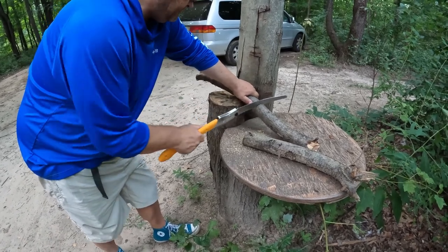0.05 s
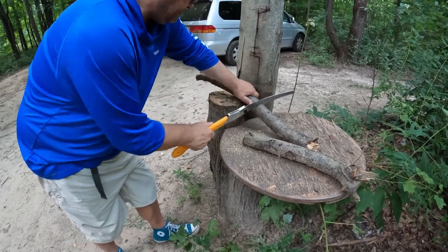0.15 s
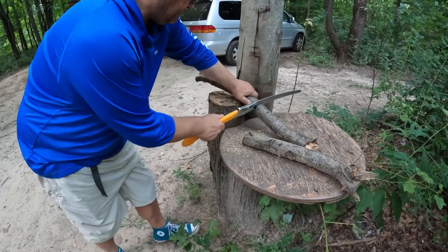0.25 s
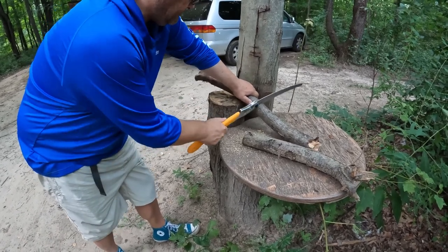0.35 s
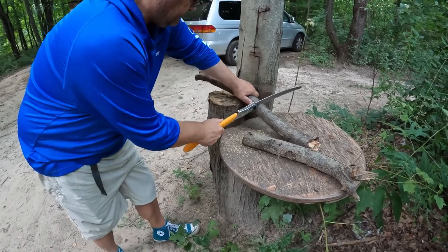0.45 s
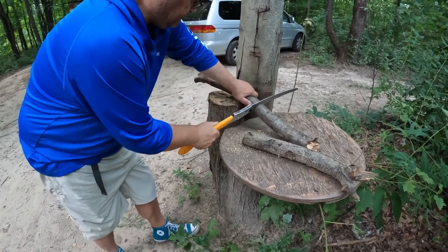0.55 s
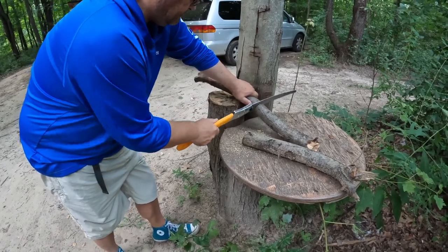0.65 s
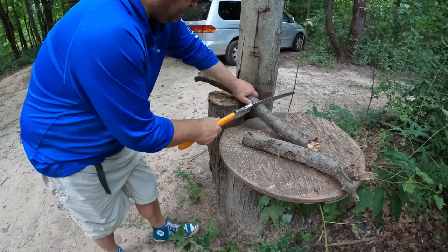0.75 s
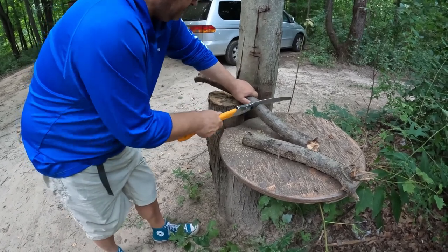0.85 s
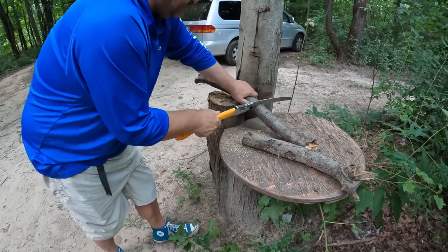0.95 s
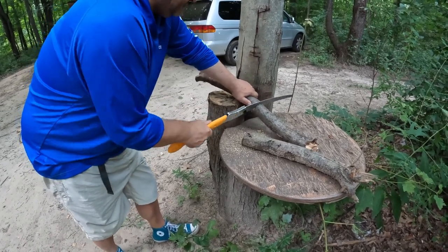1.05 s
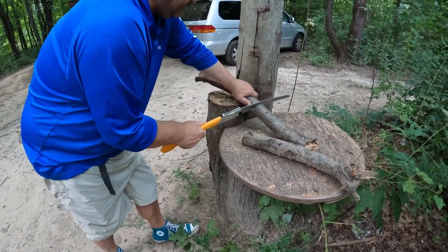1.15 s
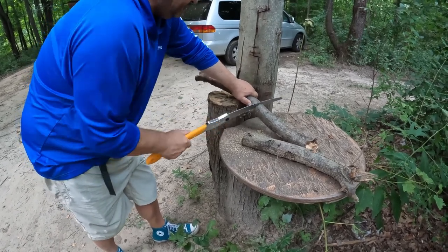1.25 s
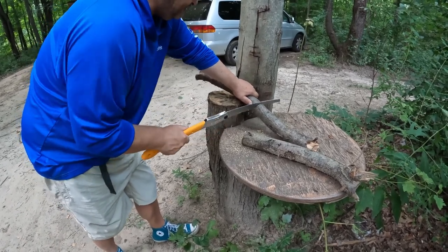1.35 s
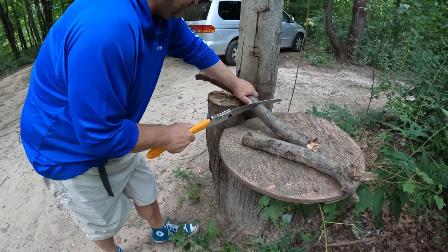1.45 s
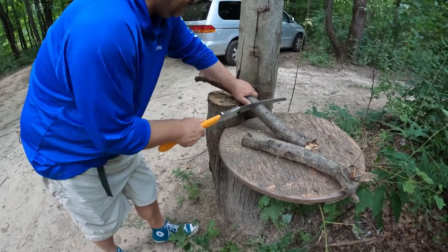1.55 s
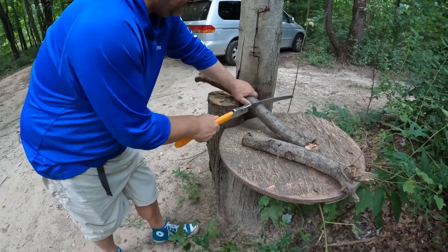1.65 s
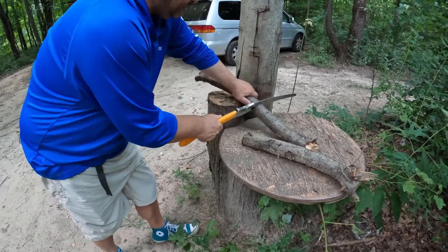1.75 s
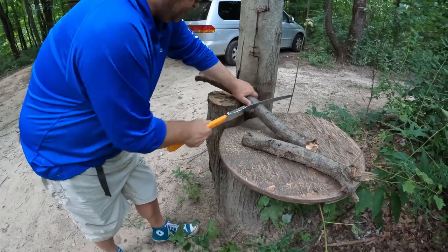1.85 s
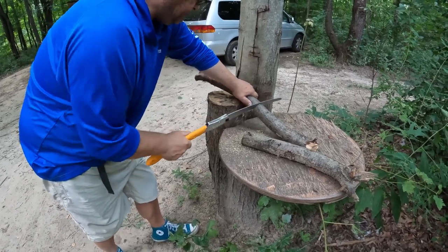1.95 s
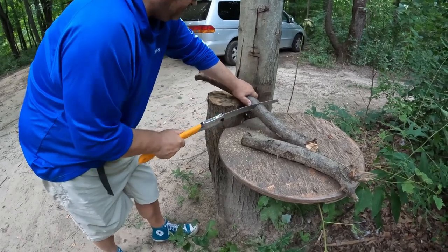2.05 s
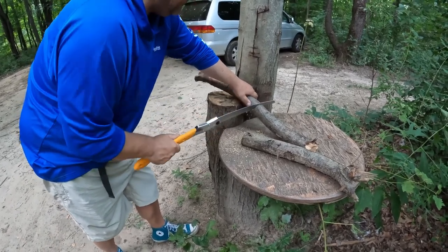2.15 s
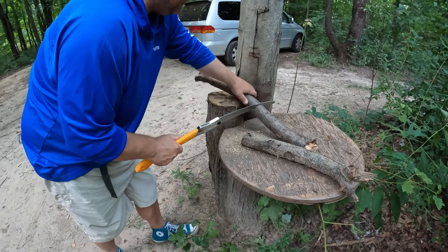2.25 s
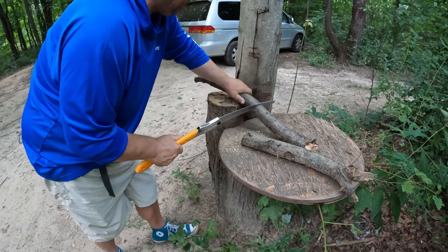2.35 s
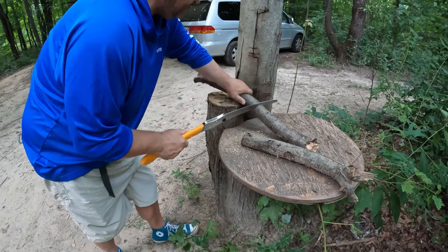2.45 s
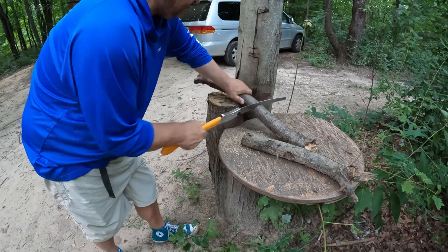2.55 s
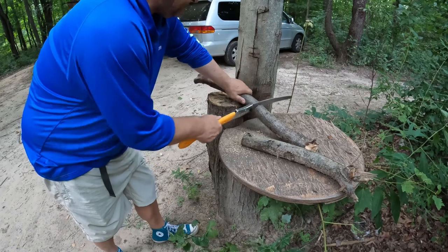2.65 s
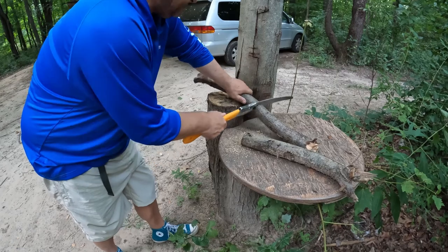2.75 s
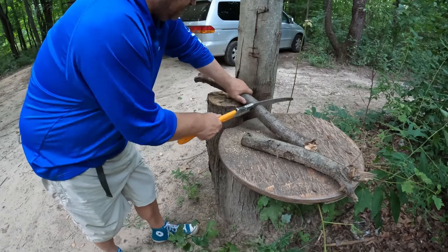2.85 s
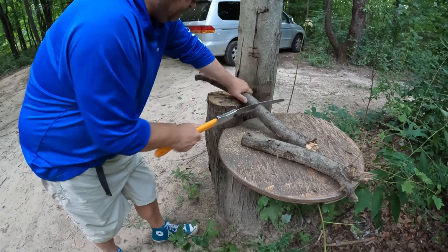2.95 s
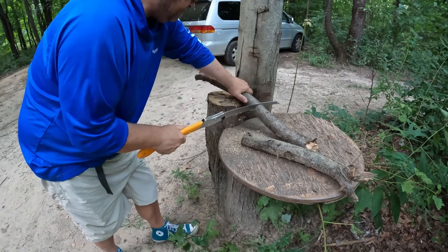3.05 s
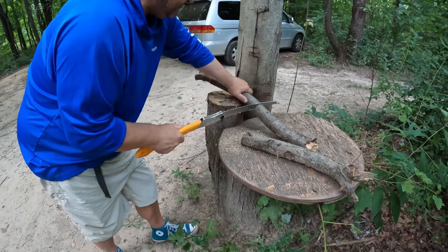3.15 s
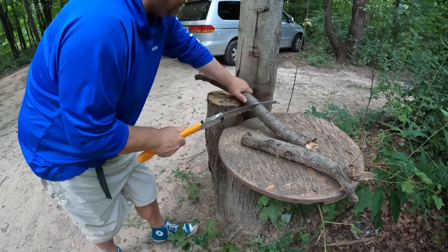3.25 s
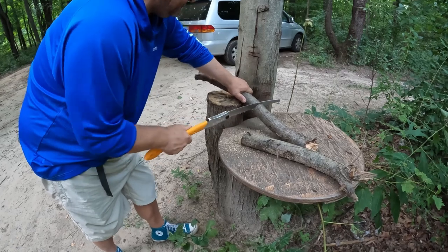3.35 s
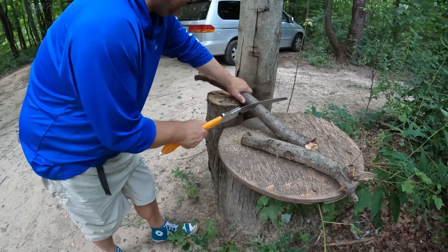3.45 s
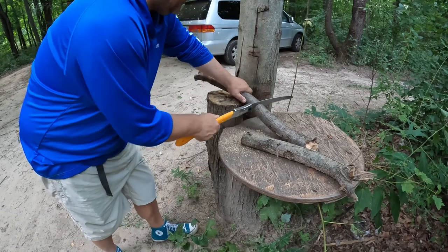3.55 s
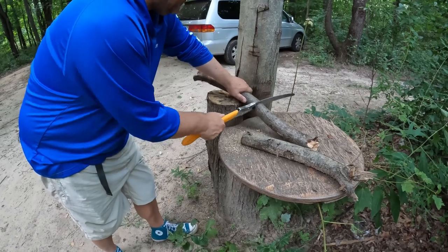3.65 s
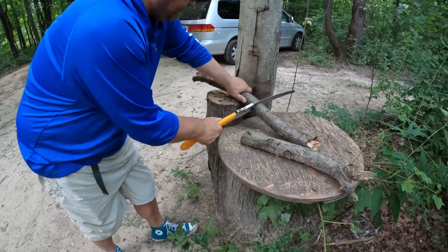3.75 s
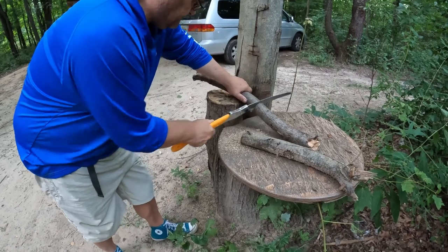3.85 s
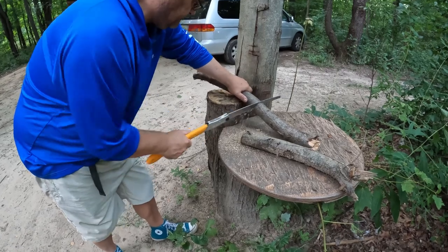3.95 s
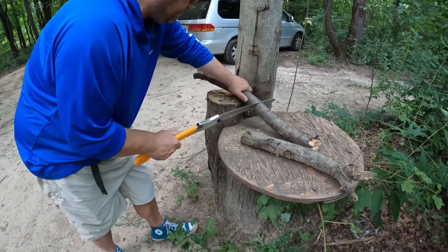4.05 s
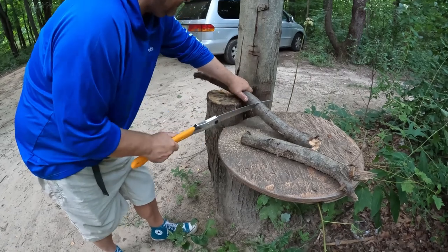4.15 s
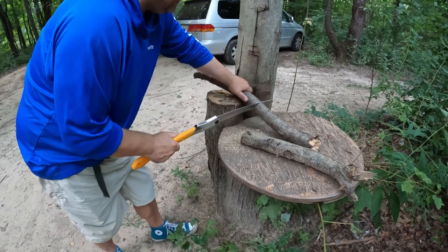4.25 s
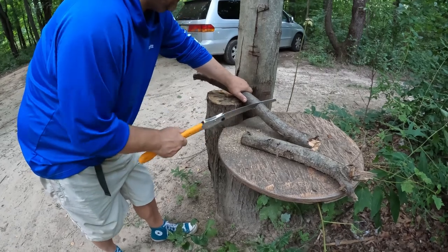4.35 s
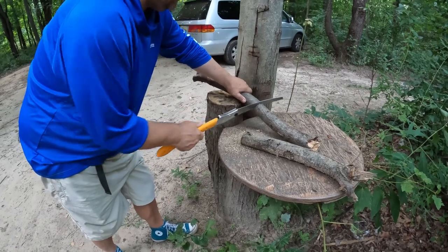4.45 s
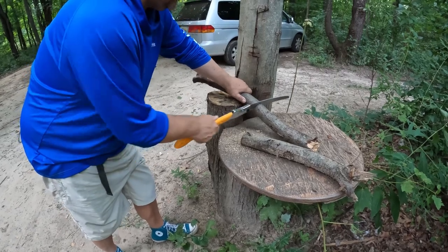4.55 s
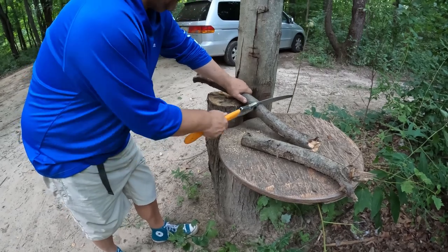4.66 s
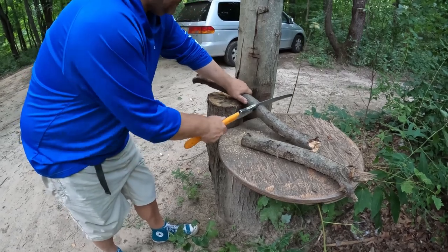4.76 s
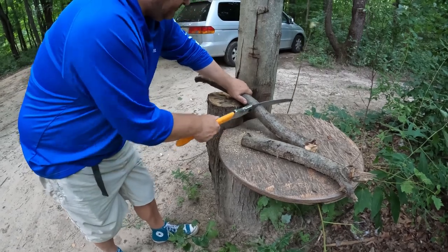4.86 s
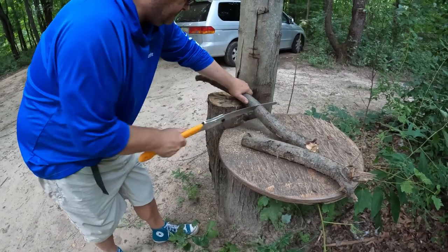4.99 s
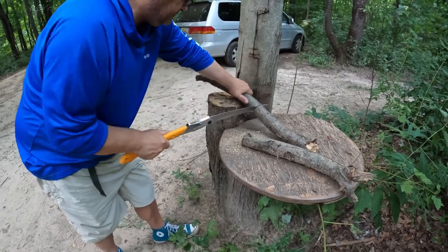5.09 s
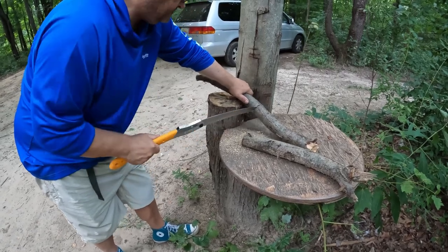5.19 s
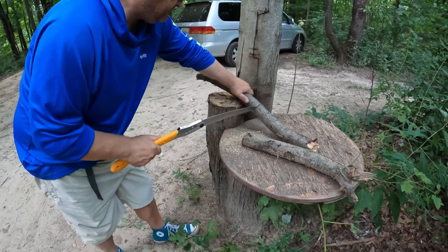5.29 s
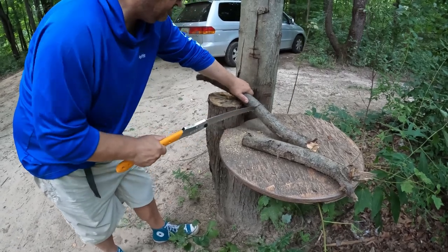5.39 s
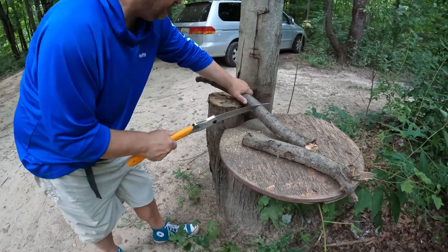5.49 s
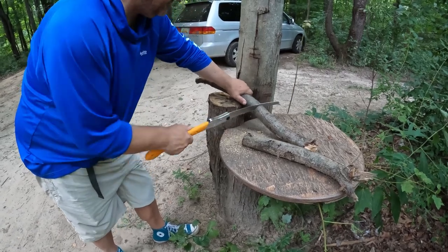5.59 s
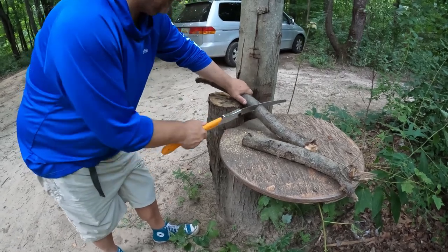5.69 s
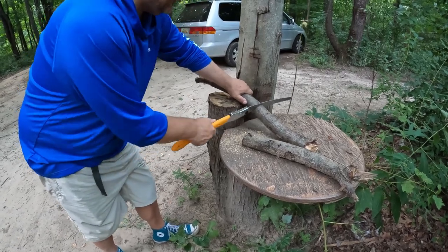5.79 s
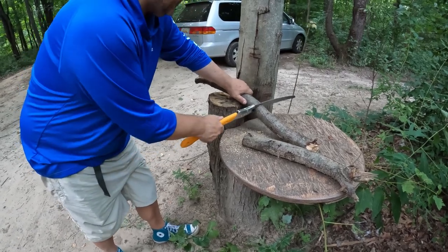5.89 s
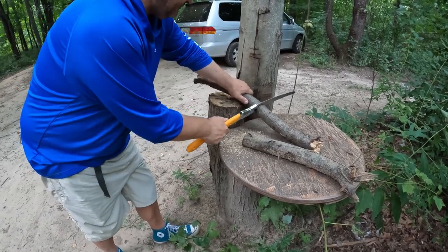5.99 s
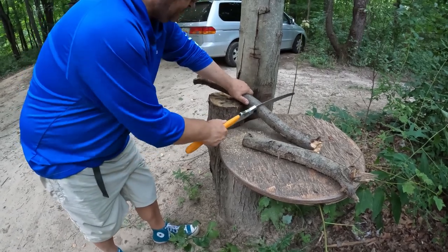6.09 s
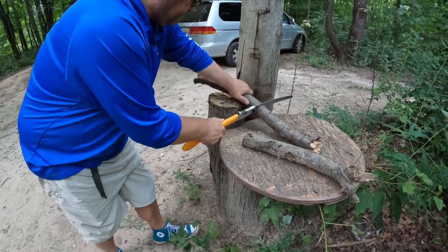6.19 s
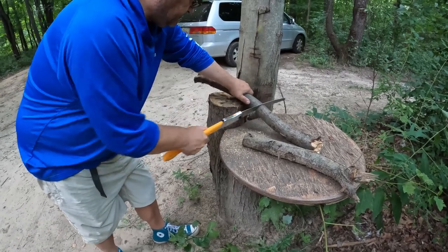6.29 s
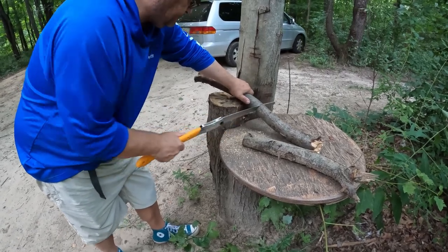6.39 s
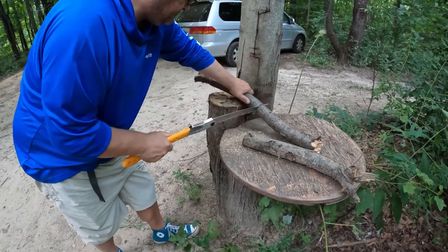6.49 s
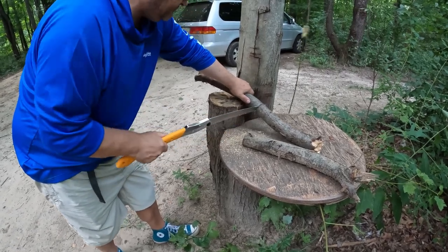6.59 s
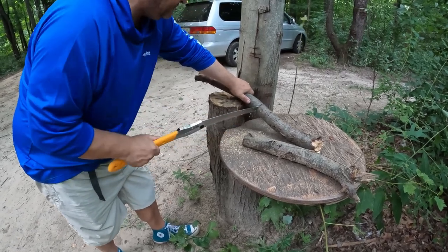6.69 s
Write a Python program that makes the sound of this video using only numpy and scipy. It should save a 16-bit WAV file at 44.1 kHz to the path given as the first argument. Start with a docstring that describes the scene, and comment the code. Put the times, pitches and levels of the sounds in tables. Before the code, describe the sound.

A hand saw works through a branch on a stump, heard from a metre or two away in dry woodland air. A push rasps from 0 to 0.45 s, ending in a knock and short grinding rub; a brief pull brings hard jolts around 0.6 s, then a pause until about 0.95. Short quick strokes follow to 1.45 s. Longer alternating strokes then run about half a second each: scratchy, bright pushes and coarser pulls with a low woody thrum near 230 Hz and a passing hollow ring. The heaviest thump lands at 1.9 s, a sharp fibre snap at 3.0. A stuttering judder comes at 4.0, knocks and rubbing at 3.8 and 4.8-4.9, a strong pull around 5.1. Clacks and grinding mark 6.0-6.2 s, then a last pull with a buzzing groan at 6.45, fading by 6.8. Faint high insect hiss and soft low air continue throughout.

```python
"""A folding pull saw cuts a branch that is held down on a stump, a metre or two from a camera in a wood.
The teeth skate on each push and tear fibres on each pull; the branch thrums, knocks on the stump and twice chatters.
Insects hiss steadily in the trees."""
import sys
import numpy as np
from scipy import signal
from scipy.fft import rfft, irfft, next_fast_len
from scipy.io import wavfile
from scipy.ndimage import uniform_filter1d, map_coordinates

SR = 44100
rng = np.random.default_rng(int(sys.argv[2]) if len(sys.argv) > 2 else 0)


def log_audio(samples):
    """Write samples as a 16-bit WAV file to the path given in sys.argv[1]."""
    # one column per channel
    frames = np.atleast_2d(samples).T
    # limit to full scale, then quantise
    limited = np.clip(frames, -1, 1)
    pcm = np.round(limited * 32767).astype(np.int16)
    wavfile.write(sys.argv[1], SR, pcm)


N = 296793

# strokes of the arm; each has one stretch where the teeth bite deeper:
# (start s, end s, pull 1 or push 0, level of the teeth dB, bite at s, bite half-length s, bite dB, thrum of the branch dB, its rocking 0-1)
STROKES = [(-.2, .03, 1, -38.5, 0, .025, 4.8, -34, 1),
           (.022, .46, 0, -42.5, .34, .03, 4, -39, .12),
           (.49, .675, 1, -55, .615, .05, 15, -46, .5),
           (.93, 1.06, 0, -61.5, .995, .015, 3, -60, .2),
           (1.062, 1.256, 1, -43, 1.125, .02, 4, -35.7, .6),
           (1.245, 1.452, 1, -45.7, 1.351, .084, 11.6, -41, .3),
           (1.51, 1.864, 0, -46.5, 1.805, .111, 10, -39, .16),
           (1.865, 2.31, 1, -45.7, 2.02, .07, 18.6, -39, .22),
           (2.46, 2.895, 0, -46.2, 2.73, .13, 6.2, -47, .03),
           (2.9, 3.282, 1, -56.5, 3.07, .157, 27, -48.5, .22),
           (3.402, 3.845, 0, -45.5, 3.61, .051, 5, -48.5, .04),
           (3.83, 4.301, 1, -47.7, 4.034, .105, 17, -37, .2),
           (4.39, 4.85, 0, -44.6, 4.718, .102, 2.9, -41.6, .02),
           (4.85, 5.368, 1, -40, 5.066, .12, 8.8, -35.4, .26),
           (5.42, 6.09, 0, -45.5, 5.77, .13, 2.5, -43, .02),
           (6.05, 6.3, 0, -54, 6.211, .025, 4, -46, .05),
           (6.24, 6.809, 1, -48.4, 6.421, .151, 18.7, -43, .08)]
# the blade catches and jolts the branch: (s, peak dB)
JOLTS = [(.409, -24.5), (1.398, -22), (2.215, -25), (2.975, -24), (3.765, -27), (3.81, -26), (4.805, -27), (.589, -16), (.629, -18), (1.191, -24), (1.21, -25), (1.312, -25), (1.905, -9), (3.857, -26), (4.092, -16), (4.2, -27.5),
         (4.877, -17), (6.083, -24), (6.21, -23.5)]
# the branch rocks against the stump: (s, peak dB)
CLACKS = [(.387, -18), (.647, -23.5), (2.486, -39), (3.754, -25), (4.767, -21), (4.903, -22), (6.034, -17.5), (6.04, -24), (6.08, -25.5)]
# single fibres snap: (s, peak dB)
SNAPS = [(0.4993, -52), (1.076, -37), (1.1218, -22), (1.54, -33), (1.6243, -25), (1.8971, -26), (2.2875, -30), (3.853, -38), (2.9734, -17.5),
         (4.875, -28), (4.903, -30)]
# the teeth stick and slip in step: (start s, end s, slips Hz, rms dB, overtones dB, unevenness dB)
CHATTER = [(4.006, 4.05, 91.2, -18.5, -2, 2.5), (6.447, 6.532, 210.7, -16, -5, .4)]
# the branch bending on its rest: (Hz, width Hz, dB)
BRANCH = [(207, 43, 5.5)]
# higher resonances of branch and blade: (Hz, width Hz, dB)
WOOD = [(340, 70, -5), (420, 60, -5), (680, 110, -2.5), (980, 90, -4.5), (1155, 42, 5), (1585, 90, -7), (2330, 160, -1)]  # fixed
# branch against stump: (Hz, width Hz, dB)
STUMP = [(242, 100, -17), (437, 118, 10.5), (650, 120, -11), (1040, 83, 4), (1160, 54, 13), (1800, 500, -13)]
# thin ringing of the steel: (Hz, width Hz, dB)
STEEL = [(3516, 174, -5), (6330, 35, -26), (6600, 30, 2.5)]
# colour of the teeth in the kerf: (Hz, dB)
RASP = [(300, -6), (650, -2), (870, -12), (1050, -2), (1750, -1), (2270, 7), (2700, -2), (3500, 1), (4500, -3.5), (5100, 3.5), (7700, 5.5), (8350, -4),
        (9700, -8), (10700, -13), (12300, -10), (15000, -30)]
# the wood's own air and its insects: (Hz, dB)
AIR = [(15, 1), (28, 4.5), (55, -13.5), (90, -44.5), (160, -14), (400, -34), (800, -47), (1200, -34), (1900, -36), (3000, -50), (8000, -58), (14000, -60)]
INSECTS = [(2800, -50), (3900, -27), (4500, -9), (4900, -1), (5350, 0), (5800, -12), (7000, -23), (10000, -45)]  # fixed
# the saw at the two microphone ports: (Hz, L-R dB), (Hz, radians left leads), (Hz, t60 s of the trees' answer)
TILT = [(200, 0), (700, -1.5), (1290, -3), (2380, -3.8), (4400, -2), (7000, .8), (13000, -.5)]  # fixed
LEAD = [(200, 0), (1380, -.4), (2670, -1.3), (3900, -.8), (5000, 0), (8000, -.2)]  # fixed
TREES = [(200, .2), (1500, .25), (4000, .22), (10000, .07)]
TOP_HZ = 14700  # fixed
# after rocking, the branch grinds on the stump: (start s, end s, rms dB)
RUBS = [(0.407, 0.454, -43.5), (1.075, 1.134, -43.5), (1.91, 1.96, -46.5), (3.764, 3.826, -41), (4.782, 4.83, -43), (4.91, 4.968, -34.5), (6.06, 6.158, -42.5)]
# overtones that the slips wake: (Hz, width Hz, dB)
BUZZ = [(352, 77, -1), (630, 65, -10), (1110, 31, -18)]
PUSH_TEETH_HZ, PULL_TEETH_HZ, SLOWEST_TEETH_HZ = 200, 225, 90  # teeth through the kerf per second
NOTE_HZ, SAG_HZ_PER_S = 232, 3.3  # the branch's bending note sinks as the kerf deepens
SCRAPE_POWER, THRUM_POWER = .89, 1  # loudness goes with these powers of the swing
RASP_DB, THRUM_DB = 1, 1.8  # gains of teeth and branch
THRUM_BITE, THRUM_LAG_S = .74, .032  # share of a bite that reaches the thrum, and its delay
THRUM_GROWS_DB = 8  # the thrum builds up from start to end of a stroke
# one resonance of the branch rings out of the scraping: (s, half-length s, rms dB)
RINGS = [(1.2, .04, -42), (1.37, .05, -37), (1.75, .08, -45), (2.02, .06, -36), (2.68, .04, -37), (3.0, .035, -36), (3.61, .03, -41), (4.07, .05, -34),
         (4.62, .04, -42), (5.005, .025, -28.5), (5.12, .12, -36), (6.4, .04, -33)]
# the teeth snag on a hard spot: (s, half-length s, dB)
SNAGS = [(.11, .018, 5), (1.635, .018, 5), (2.125, .025, -3.5), (2.21, .04, 3), (2.975, .015, 5), (4.25, .025, 5), (4.44, .025, 4), (4.75, .015, 7),
         (5.01, .02, 5), (5.32, .03, 5), (5.55, .04, 3), (6.02, .035, 11), (6.72, .03, 5)]
STALL_DB = -8  # while the branch grinds on the stump it moves with the blade, and the teeth hardly cut
PULL_SHARP_HZ, PULL_RISE_HZ = 7, 14  # a pull tightens the branch: its note is higher, and climbs from this far below to this far above
TEAR_DB, TEAR_PULL_DB, TEAR_LAG_S = -.5, 1.2, .01  # tearing wood relative to the teeth; extra on the pull; its delay behind a bite
CRUNCH_DB = -3  # dull crunch of the chips on the pull, relative to the tearing
# broad colour of that crunch: (Hz, width Hz, dB)
CRUNCH = [(75, 40, -1), (330, 110, 5), (850, 220, -4)]
THRUM_WAVER_DB = 1.2  # the thrum wavers with the grain of the wood
# the microphone's treble, with a notch from its port: (Hz, dB)
MIC = [(8300, 0), (8800, -10), (9500, -3.5), (12000, -1), (13200, -11), (14700, -18)]
RING_HZ, RING_SAG_HZ_PER_S = 1205, 10  # that resonance also sinks as the kerf deepens


def amp(db):
    """Decibels to gain."""
    return 10 ** (np.asarray(db) / 20)


def unit(x):
    """x at rms 1."""
    return x / np.sqrt(np.mean(x ** 2) + 1e-20)


def steady(x, span):
    """x at rms 1 within every span seconds, so that only its fast grain is left."""
    power = np.abs(uniform_filter1d(uniform_filter1d(x ** 2, int(span * SR) + 1), int(span * SR / 2) + 1))
    return x / np.sqrt(power + 1e-4 * power.mean())  # fixed


def along(points, hz):
    """(Hz, value) points on a log axis."""
    f, v = np.transpose(points)
    return np.interp(np.log(hz + 1), np.log(f + 1), v)


def filtered(x, response):
    """x times a complex response of frequency."""
    m = next_fast_len(x.shape[-1] + SR // 2)
    return irfft(rfft(x, m) * response(np.fft.rfftfreq(m, 1 / SR)), m)[..., :x.shape[-1]]


def coloured(x, spectrum):
    """x through a (Hz, dB) spectrum."""
    return filtered(x, lambda hz: amp(along(spectrum, hz)))


def ring(x, modes):
    """x through a set of resonances."""
    return filtered(x, lambda f: sum(amp(db) * 1j * f * w / (c * c - f * f + 1j * f * w) for c, w, db in modes))


def add(track, s, sound):
    """Mix a sound into the track at s seconds."""
    part = track[max(round(s * SR), 0):][:len(sound)]
    part += sound[:len(part)]


def arm():
    """Each stroke speeds up from rest and slows again; a pull tightens the branch, so its note rises."""
    rate, pull, rock = np.full(N, float(SLOWEST_TEETH_HZ)), np.zeros(N), np.zeros(N)
    note = NOTE_HZ - SAG_HZ_PER_S * np.arange(N) / SR
    for start, end, pulling, *_, rocking in STROKES:
        progress, swing = stroke(start, end)
        speed = swing ** .6
        rate = np.maximum(rate, (PULL_TEETH_HZ if pulling > .5 else PUSH_TEETH_HZ) * speed)
        pull += .7 * pulling * speed
        rock += rocking * speed
        note += pulling * (PULL_SHARP_HZ + PULL_RISE_HZ * (2 * progress - 1)) * (progress > 0) * (progress < 1)
    return rate, np.clip(pull, 0, 1), rock, note


def teeth(travel, scatter, size_db, set_db):
    """One blow per tooth at uneven moments; left-set and right-set teeth bite unequally."""
    k = np.arange(int(travel[-1]))
    late, size = rng.standard_normal((len(k), 2)).T
    at = np.searchsorted(travel, k + scatter * late).clip(0, N - 1)
    return np.bincount(at, amp(size_db * size + set_db * (k % 2)), N)


def tearing(blows, life, smooth):
    """Every blow starts a short burst of breaking fibres, over a smooth rub."""
    bursts = unit(signal.lfilter([1], [1, -np.exp(-1 / (life * SR))], blows))
    return (bursts + smooth) * rng.standard_normal(N)


def skating(rate, patchy_db, top_hz):
    """Tooth tips read the wood's fine ridges: short chirps whose pitch follows the blade's speed."""
    place = np.cumsum(rate / top_hz)
    surface = patchy(rng.standard_normal(int(place[-1]) + SR), patchy_db, size=1024)
    return map_coordinates(surface, [place], order=3)


def saw():
    """The teeth rasp in the kerf and shake the wood, harder and grainier on the pull."""
    rasp_gain, tear_gain, thrum_gain = effort()
    rate, pull, rock, note = arm()
    travel = np.cumsum(rate)  # in teeth
    blows = teeth(travel, scatter=.13, size_db=8.5, set_db=-3)
    patches = hardness(travel, clump=3)  # fixed
    # cutting edge: torn grains on the pull, chirps on the push, both ringing the steel
    grains = steady(tearing(blows, life=.0007, smooth=.25), span=.04)  # fixed
    chirps = steady(skating(rate, patchy_db=7, top_hz=149.5) * amp(4.2 * hardness(travel, clump=.5)), span=0.055)
    edge = patchy(grains * amp(-2 + 5 * pull) + chirps * amp(3 - 4.5 * pull), patchy_db=4.7, size=512)  # fixed
    rasp = steady(coloured(edge + ring(edge, STEEL), RASP), span=.07) * amp(2.3 * patches)  # fixed
    # the same blows shake the wood
    force = steady(blows, span=.04) * .45 + steady(tearing(blows, life=.0015, smooth=0.34), span=0.049)
    wood = steady(soft(ring(patchy(force, patchy_db=3, size=1536), WOOD), corner_hz=3660), span=.05) * amp(0.4 * patches)
    bending = [(222.4, 199, 0)]
    thrum = steady(ring(ring(moving_ring(force, note, width_hz=28.5), bending), bending), span=0.037)
    sway = steady(ring(ring(force, [(110.4, 24, 0)]), [(105.6, 43, 0)]), span=0.013)  # the whole branch rocks under the pull
    crunch = steady(soft(ring(force, CRUNCH), corner_hz=1500), span=.03) * amp(CRUNCH_DB) * pull
    waver = amp(THRUM_WAVER_DB * hardness(travel, clump=5))
    return rasp_gain * rasp + tear_gain * (wood + crunch) + thrum_gain * (waver * thrum + rock * sway)


def chatter():
    """Regular slips swell and fade, driving the branch at their own rate with a buzz of overtones."""
    track, t = np.zeros(N), np.arange(SR // 4) / SR
    for start, end, slip_hz, db, buzz_db, uneven_db in CHATTER:
        at = np.arange(0, end - start, 1 / slip_hz)
        swell_db = -14 * (at / (end - start) - .28) ** 2
        slips = np.bincount((at * SR).astype(int), amp(swell_db + uneven_db * rng.standard_normal(len(at))), len(t))
        bout = soft(ring(slips, BRANCH), corner_hz=400) + amp(buzz_db) * soft(ring(slips, BUZZ), corner_hz=1300)
        add(track, start, amp(db) * bout / np.sqrt(np.mean(bout[t < end - start] ** 2)))
    return track


def hits(rows, modes, contact, grit):
    """Each contact is one gritty push, contact seconds long, into a set of resonances."""
    track, t = np.zeros(N), np.arange(SR // 5) / SR
    for s, db in rows:
        push = t / contact * np.exp(-t / contact) * (1 + grit * rng.standard_normal(len(t)))
        sound = ring(push, modes)
        add(track, s, amp(db) * sound / np.abs(sound).max())
    return track


def knocks():
    """Soft jolts swell through the branch; hard clacks come from the stump."""
    jolts = ring(hits(JOLTS, [(211.5, 45, 0)], contact=0.00027, grit=.2), [(211, 110, 2.1)])
    return jolts + soft(hits(CLACKS, STUMP, contact=0.00013, grit=0.76), corner_hz=2600)


def snaps():
    """A fibre gives way with a few milliseconds of bright crack."""
    track, t = np.zeros(N), np.arange(SR // 20) / SR
    for s, db in SNAPS:
        crack = amp(-60 * t / .032) * (1 - np.exp(-t / .0005)) * rng.standard_normal(len(t))  # fixed
        crack = coloured(crack + ring(crack, STEEL), RASP)
        add(track, s, amp(db) * crack / np.abs(crack).max())
    return track


def trees(x):
    """Trunks and ground return a faint, diffuse answer that changes as the sawyer moves."""
    answer, hop = np.zeros((2, N)), SR // 4
    for start in range(-hop, N, hop):
        hz, t, z = signal.stft(rng.standard_normal((2, SR // 2)), SR, nperseg=256)  # fixed
        tails = signal.istft(z * amp(-60 * t / along(TREES, hz)[:, None]), SR, nperseg=256)[1]  # fixed
        at = np.arange(max(start, 0), min(start + 2 * hop, N))
        part = x[at] * np.sin(np.pi * (at - start) / (2 * hop))
        for side, tail in zip(answer, tails):
            add(side, at[0] / SR, signal.fftconvolve(part, tail / np.linalg.norm(tail)))
    return answer


def ambience(spectrum, db, width):
    """Steady stereo noise from all around."""
    mid, side = coloured(rng.standard_normal((2, N)), spectrum)
    return amp(db) * unit(np.array([mid + width * side, mid - width * side]))


def soft(x, corner_hz):
    """Wood passes little above its corner."""
    return filtered(x, lambda hz: 1 / (1 + 1.4j * hz / corner_hz - (hz / corner_hz) ** 2))


def moving_ring(x, centre, width_hz):
    """x through a resonance whose centre frequency drifts."""
    turn = np.exp(2j * np.pi * np.cumsum(centre) / SR)
    return (turn * signal.lfilter([1], [1, -np.exp(-np.pi * width_hz / SR)], x / turn)).real




def hardness(travel, clump):
    """Hard and soft patches of wood, each some teeth long."""
    return map_coordinates(rng.standard_normal(int(travel[-1] / clump) + 4), [travel / clump])


def rubs():
    """Bark grinds over the sawn top in quick, uneven slips."""
    track = np.zeros(N)
    slips = tearing(teeth(np.arange(N) * 220 / SR, scatter=0.26, size_db=5, set_db=-1.5), life=0.0014, smooth=0.98)
    grind = steady(soft(ring(slips, [(416, 110, 3), (676, 140, 3), (1330, 300, -14.5)]), corner_hz=1920), span=0.017)
    for start, end, db in RUBS:
        part = grind[int(start * SR):int(end * SR)]
        add(track, start, amp(db) * part * unit(signal.windows.tukey(len(part), .5)))
    return track


def patchy(x, patchy_db, size):
    """Every bundle of fibres has its own colour: random gains in patches about size samples long."""
    z = signal.stft(x, nperseg=size)[2]
    field = unit(uniform_filter1d(uniform_filter1d(rng.standard_normal(z.shape), size=3, axis=0), size=2, axis=1))
    return signal.istft(z * amp(patchy_db * np.clip(field, -2, 2)), nperseg=size)[1][:len(x)]


def stroke(start, end):
    """Progress 0-1 through a stroke, and the arm's swing, which rises from rest and returns to it."""
    progress = np.clip((np.arange(N) / SR - start) / (end - start), 0, 1)
    return progress, np.abs(np.sin(np.pi * progress))


def effort():
    """Gains of rasp, tearing and thrum: all follow the swing and swell where the teeth bite; the thrum comes late."""
    rasp, tear, thrum = np.zeros((3, N))
    for start, end, pulling, level_db, bite_s, bite_length, bite_db, thrum_db, _ in STROKES:
        progress, swing = stroke(start, end)
        scrape = swing ** SCRAPE_POWER * amp(level_db)
        rasp += scrape * amp(RASP_DB + bite_db * bell(bite_s, bite_length))
        tear += scrape * amp(TEAR_DB + TEAR_PULL_DB * pulling + bite_db * bell(bite_s + TEAR_LAG_S, bite_length))
        swell_db = THRUM_BITE * bite_db * bell(bite_s + THRUM_LAG_S, bite_length) + THRUM_GROWS_DB * (progress - .5)
        thrum += swing ** THRUM_POWER * amp(THRUM_DB + thrum_db + swell_db)
    snag_db = sum(db * bell(s, half_length) for s, half_length, db in SNAGS)
    stalled = sum(bell((start + end) / 2, (end - start) / 2) for start, end, _ in RUBS)
    return rasp * amp(snag_db + STALL_DB * stalled), tear * amp(snag_db / 2), thrum


def bell(s, half_length):
    """A smooth bump of height 1 around s seconds."""
    return np.exp(-((np.arange(N) / SR - s) / half_length) ** 2)


def ringing():
    """One narrow resonance swells out of the scraping."""
    centre = RING_HZ - RING_SAG_HZ_PER_S * np.arange(N) / SR
    tone = moving_ring(moving_ring(rng.standard_normal(N), centre, width_hz=65), centre, width_hz=65)
    return steady(tone, span=.03) * sum(amp(db) * bell(s, half_length) for s, half_length, db in RINGS)


def scene():
    """The work sits a little to the right, amid quiet woodland."""
    work = saw() + ringing() + chatter() + knocks() + rubs() + snaps()
    half = lambda hz: amp(along(TILT, hz) / 2) * np.exp(.5j * along(LEAD, hz))
    direct = filtered(work, lambda hz: np.array([half(hz), 1 / half(hz)]))
    answer = trees(coloured(work, [(200, -29), (600, -19), (1200, -13), (2400, -11), (5000, -13), (8000, -12), (12000, -2)]))
    return direct + answer + ambience(AIR, db=-50.0, width=0.32) + ambience(INSECTS, db=-60.5, width=0.73)


def record(dry):
    """The camera's microphone dulls the top, and nothing is kept above its band limit."""
    return filtered(dry, lambda hz: amp(along(MIC, hz)) * (hz < TOP_HZ))


dry = scene()
out = record(dry)
log_audio(out)
```